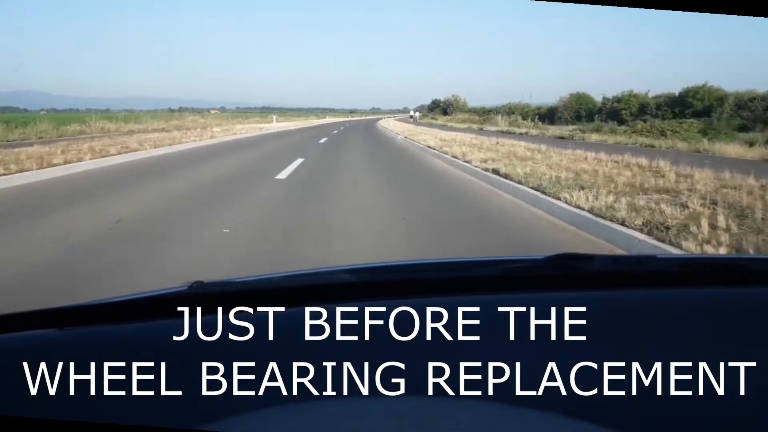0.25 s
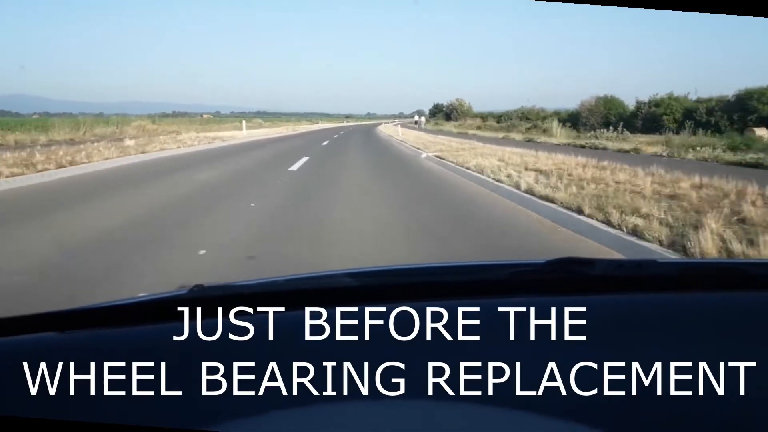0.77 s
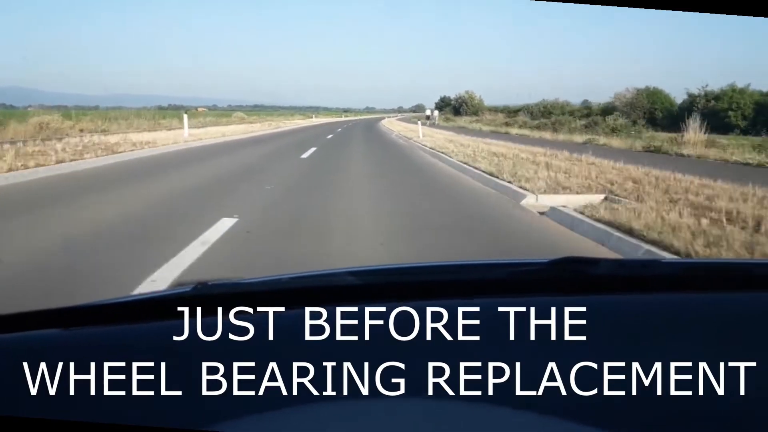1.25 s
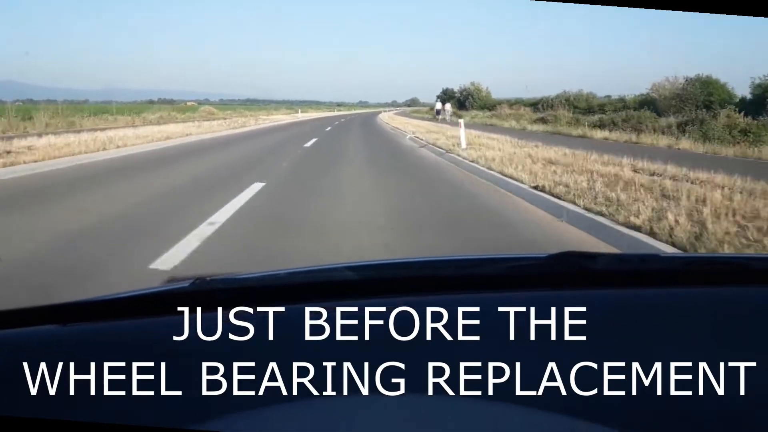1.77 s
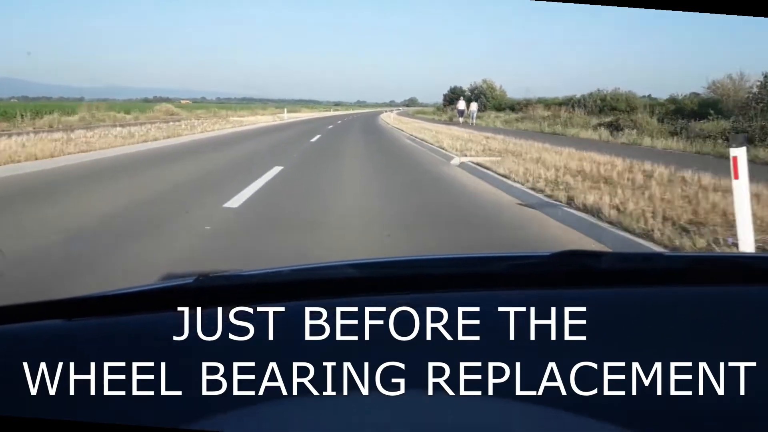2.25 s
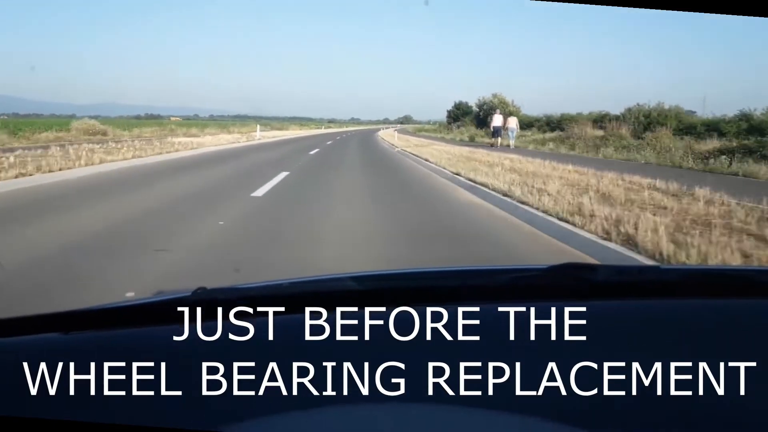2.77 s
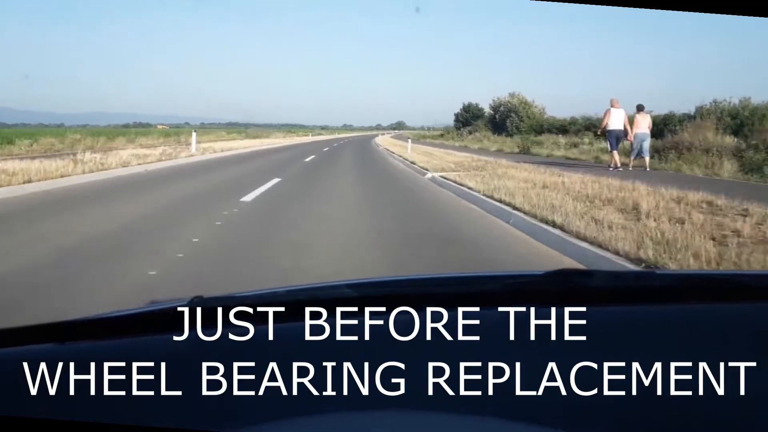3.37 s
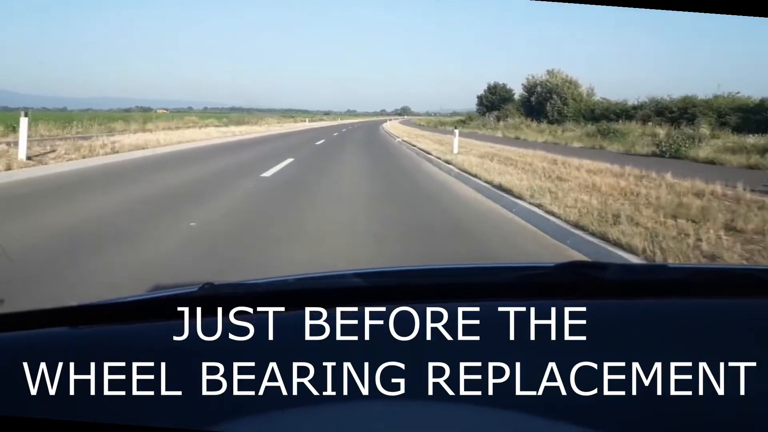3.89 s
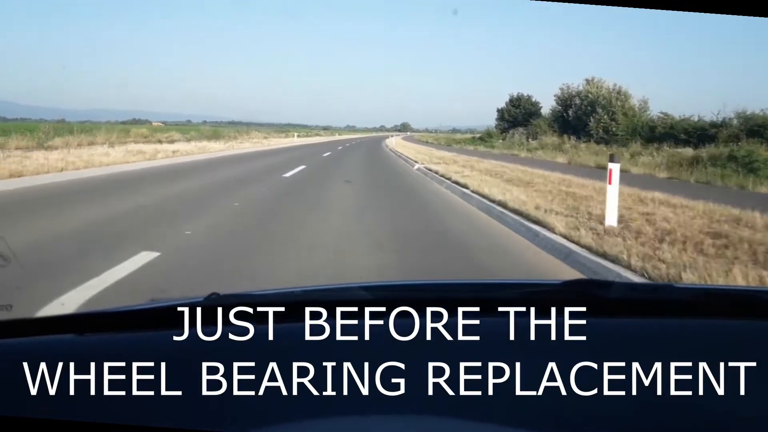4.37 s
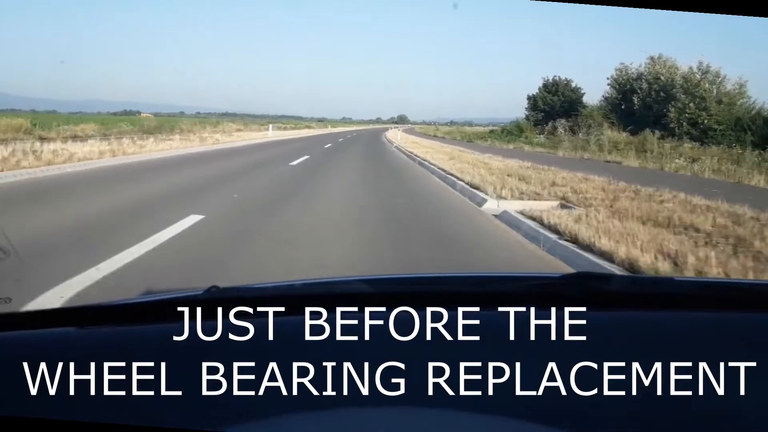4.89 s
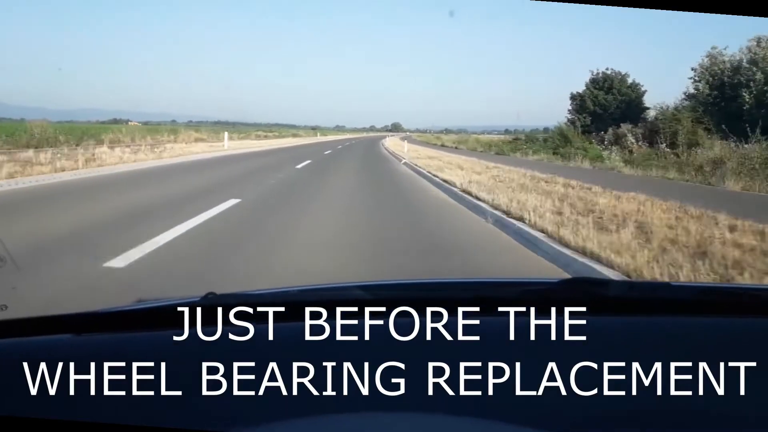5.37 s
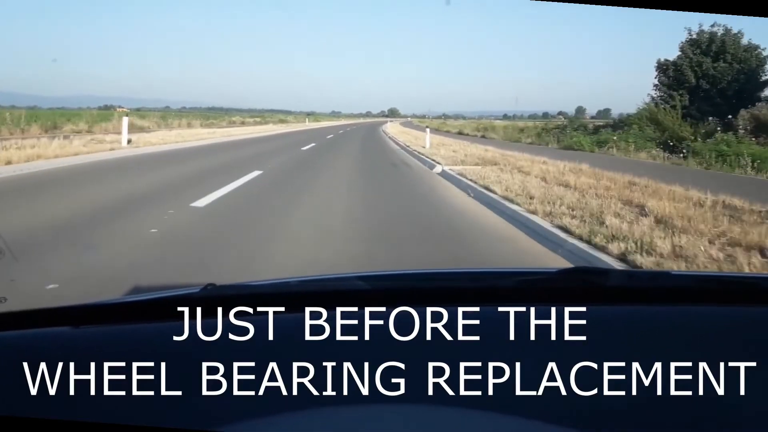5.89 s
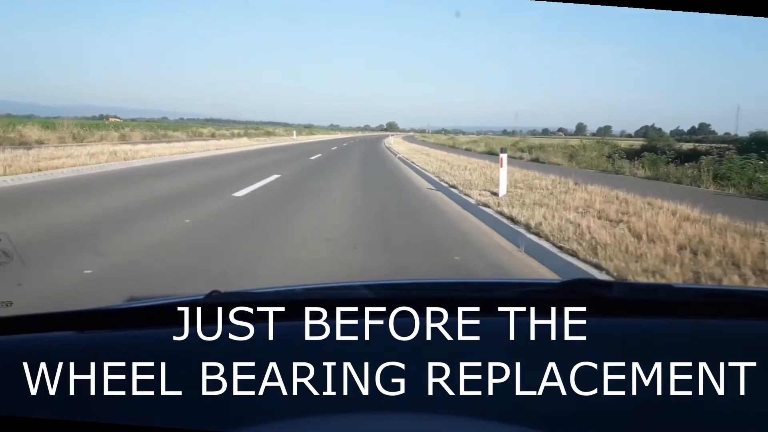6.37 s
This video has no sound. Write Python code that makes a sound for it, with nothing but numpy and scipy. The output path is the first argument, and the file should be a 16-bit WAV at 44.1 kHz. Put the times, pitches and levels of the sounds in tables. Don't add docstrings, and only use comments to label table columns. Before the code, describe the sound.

The enclosed cabin of a car cruising on smooth asphalt, heard from the dashboard for about 6.6 seconds. A worn wheel bearing drones throughout, a dense humming howl strongest near 360 hertz, with lower tones around 120 and 180 to 240 hertz and weaker harmonics above. It fills out within the first 0.2 seconds, grows stronger after about 2.4, and is fullest around 3.2 to 3.8, then keeps wavering. Rapid throbbing at roughly 14 pulses a second follows wheel rotation; slower road loads make the low tones swell and dip, notably dipping near 4.5. Pitch creeps up very slightly. Engine hum near 100 hertz, boomy body rumble, tyre roar and soft wind continue beneath. Faint high swishes pass in a repeating pattern. Small plastic ticks occur sporadically, with the clearest pair around 5.8 and another near 6.4.

```python
import sys
import numpy as np
from scipy import signal
from scipy.fft import rfft, irfft, next_fast_len
from scipy.io import wavfile
from scipy.ndimage import uniform_filter1d, minimum_filter1d

SR = 44100
rng = np.random.default_rng(int(sys.argv[2]) if len(sys.argv) > 2 else 0)


def natural_amplitude(level_db):
    exponent = np.asarray(level_db, float) / 20
    return 10 ** exponent


def log_audio(samples):
    frames = np.atleast_2d(samples).T
    limited = np.clip(frames, -1, 1)
    pcm = np.round(limited * 32767).astype(np.int16)
    wavfile.write(sys.argv[1], SR, pcm)


N = 292824
T = np.arange(N) / SR
WHEEL = .1553


def bump(s, length):
    return np.exp(-((T - s) / length) ** 2)


def walk(rate):
    hold = int(SR / rate)
    steps = np.repeat(rng.standard_normal(N // hold + 1), hold)
    return 0.77 * uniform_filter1d(uniform_filter1d(steps, hold), hold)[:N]


def noise(points, flicker_db, rate, peaks=()):
    size = next_fast_len(N)
    hz = np.maximum(np.arange(size // 2 + 1) * SR / size, 1)
    point_hz, point_db = np.transpose(points)
    density_db = np.interp(np.log(hz), np.log(point_hz), point_db, left=-140, right=-140)
    for centre, width, lift_db in peaks:
        density_db += lift_db / (1 + (2 * (hz - centre) / width) ** 2)
    spectrum = rfft(rng.standard_normal(size)) * natural_amplitude(density_db) * np.sqrt(SR / 2)
    out = 0
    for octave in range(4, 15):
        share = np.clip(1 - np.abs(np.log2(hz) - octave), 0, 1)
        out = out + natural_amplitude(flicker_db * walk(rate)) * irfft(spectrum * share, size)[:N]
    return out


def band(low_hz, high_hz):
    sos = signal.butter(2, [low_hz, high_hz], "band", fs=SR, output="sos")
    return signal.sosfilt(sos, rng.standard_normal(N))


def line(turns, db, waver_db, blur):
    phase = 2 * np.pi * (turns + rng.random()) + blur * walk(6)
    return np.sqrt(2) * natural_amplitude(db + waver_db * walk(4)) * np.sin(phase)


# rockings a second in Hz, pitch swing in Hz,
# first crest in seconds.
SWAY = [(1.74, .09, .293), (1.15, .065, .83)]


def ball_passes():
    rocking = sum(swing * np.cos(2 * np.pi * rate * (T - s)) for rate, swing, s in SWAY)
    start_hz, gain_hz_per_s = 90.24, .106
    return np.cumsum(start_hz + gain_hz_per_s * T + rocking) / SR


# pitch in Hz, level in dB per Hz.
HISS = [(2000, -97.5), (2900, -85.5), (3500, -82), (4300, -80), (5000, -87), (5800, -91.5), (7000, -88.5),
        (7400, -94.5), (7900, -105), (10500, -108), (11500, -106.5), (15800, -107)]


def wind():
    return noise(HISS, flicker_db=1.2, rate=14)


# pitch in Hz, level in dB per Hz.
BOOM = [(22, -71.5), (40, -50), (65, -46.5), (95, -45.5), (112, -36.5), (130, -42), (160, -43), (250, -47),
        (300, -49.5), (350, -46), (400, -52.5), (480, -53), (700, -59.5)]


def body_boom():
    return natural_amplitude(1.74 * walk(7)) * noise(BOOM, flicker_db=2.17, rate=5)


# pitch in Hz, level in dB per Hz.
ROAR = [(700, -60), (830, -56), (1200, -60.5), (1700, -67), (2100, -66.5), (2400, -77.5), (2900, -85),
        (3400, -93.5)]
# pitch in Hz, width in Hz, lift in dB.
PANELS = [(1177, 48, 5), (1307, 37, 4.5), (1475, 100, 4), (1634.8, 44, 6), (1973, 70, 5.5), (2240, 60, 3.5),
          (2345, 40, 3.5), (2523, 31, 7), (2740, 55, 5)]
# middle in seconds, roar change in dB, length in seconds.
PATCHES = [
    (0.498, 1, 0.54),
    (2.454, -1.5, 0.12),
    (3.2, 0.5, 0.28),
    (4.1, -1, 0.089),
    (5.4, -.5, 0.46),
    (6.25, 0, .15),
]


def tyre_roar(turns):
    patches_db = sum(db * bump(s, length) for s, db, length in PATCHES)
    grit = natural_amplitude(1.28 * walk(7.8) + patches_db)
    roar = grit * noise(ROAR, flicker_db=.5, rate=8.2, peaks=PANELS)
    return roar * (1 + 0.079 * np.sin(2 * np.pi * turns))


# time into the row in seconds, level in dB, length in seconds.
SWISHES = [
    (.44, -71.5, .055),
    (.64, -75, .022),
    (.89, -71.5, .048),
    (1.07, -76, .015),
    (1.55, -72, .055),
]


def high_swishes():
    row_s = 1.775
    swelling = sum(natural_amplitude(db) * bump(s + row * row_s, length) for s, db, length in SWISHES for row in range(4))
    return natural_amplitude(2.5 * walk(60)) * swelling * (5.5 * band(7000, 9300) + 2.1 * band(9000, 12500))


# start in seconds, peak level in dB, extra middle ring in dB, extra top ring in dB.
TICKS = [(0.071, -50.5, 1, 0), (0.115, -55, 0.1, 3.5), (0.4871, -50, 11.5, -3), (0.9955, -54.5, -2, 7),
         (1.0794, -57.5, 3, -1), (1.498, -52.5, 0, -3), (1.943, -52.5, 1, -1), (2.8122, -54, 0, 0.5),
         (3.9219, -49.5, 0, 7), (4.3488, -52.5, -4, 2.5), (5.3442, -47.5, -4.5, 3.5), (5.7623, -40, 1, -2),
         (5.8194, -43, -3, -1), (6.406, -49, -3, 3.5)]


def trim_ticks():
    low, middle, top = 9 * band(3600, 4900), 3.5 * band(6300, 7500), band(11000, 15500)
    out = 0
    for s, db, middle_db, top_db in TICKS:
        fade = (T >= s) * np.exp(-np.maximum(T - s, 0) / 0.006)
        ring = low + natural_amplitude(middle_db) * middle + natural_amplitude(top_db) * top
        out = out + natural_amplitude(db - 6.0) * fade * ring
    return out


def trim_creaks():
    creaks_per_s, creak_db, spread_db, fade_s = 12, -72, 3.5, .002
    slips = rng.random(N) < creaks_per_s / SR
    starts = slips * natural_amplitude(creak_db + spread_db * rng.exponential(size=N))
    fading = signal.lfilter([1], [1, -np.exp(-1 / (fade_s * SR))], starts)
    return fading * 2 * band(8000, 15500)


# cycles per wheel turn, level in dB.
TYRE = [(2, -46), (3, -37), (4, -39), (5, -46), (6, -40), (8, -32), (9, -35), (10, -39), (27.75, -36),
        (36.35, -41)]


def tyre_hum(wheel):
    return sum(line(k * wheel, db, waver_db=1.5, blur=0.38) for k, db in TYRE)


# multiple of the firing pitch, level in dB.
ENGINE = [(1, -22), (2, -42), (3, -45), (3.25, -38), (4, -36), (5, -39), (6, -51), (6.25, -43), (8, -53),
          (10, -55)]


def engine_hum(turns):
    firing = 1.0765 * turns
    return sum(line(k * firing, db, waver_db=2.5, blur=0.12) for k, db in ENGINE)


def race(turns, wheel, table, loud, loud_db):
    out = 0
    for k, db, below_db, above_db in table:
        k = round(k)
        if k == loud:
            out = out + line(k * turns, loud_db, waver_db=1.17, blur=0.21)
        else:
            out = out + line(k * turns, db, waver_db=1.5 + .05 * k, blur=.025 * k)
        for side, side_db in ((-1, below_db), (0.96, above_db)):
            if side_db > -60:
                out = out + line(k * turns + side * wheel, side_db, waver_db=0.5, blur=0.37)
    return out


# harmonic number, level in dB, side tone one wheel turn below in dB,
# side tone one wheel turn above in dB.
INNER = [(1, -18, -45, -46), (2, -29, -27, -33), (4, -53, -44, -45), (5, -57, -43, -52), (7, -42, -48, -44),
         (8, -44, -50, -51), (10, -49, -64, -58), (11, -54, -47, -52)]
# middle in seconds, change in dB.
SWELLS = [(1.25, 2.5), (1.95, -7.5), (2.27, 7.5), (2.75, -4), (3.2, 6), (3.5, -8), (4.08, 5.5), (4.52, -17),
          (5.32, -1.5), (5.88, 7), (6.43, 3)]


def inner_race(turns, wheel):
    load_db = 1.5 * walk(6) + sum(db * bump(s, .055) for s, db in SWELLS)
    return race(1.333 * turns, wheel, INNER, loud=1, loud_db=-18 + load_db)


# harmonic number, level in dB, side tone one wheel turn below in dB,
# side tone one wheel turn above in dB.
OUTER = [(1, -46, -50, -45), (2, -25, -43, -32), (3, -30, -52, -54), (4, -14, -36, -39), (5, -36, -59, -53),
         (6, -29, -57, -52), (7, -29, -56, -52), (8, -45, -50, -45), (9, -45, -58, -49),
         (10, -43, -65, -64), (11, -40, -61, -56), (12, -41, -65, -64), (13, -39, -65, -64),
         (14, -46, -66, -68), (15, -57, -67, -66), (16, -46, -54, -55), (17, -47, -68, -66),
         (18, -53, -61, -67), (19, -61, -64, -71), (20, -59, -72, -68), (21, -58, -69, -71),
         (22, -47, -69, -66), (23, -58, -71, -64), (24, -64, -65, -74), (25, -72, -76, -68),
         (26, -64, -68, -72)]
# harmonic number,
# change in dB per second.
DRIFT = [(7, .3), (9, -.6), (11, .8), (12, -.9), (13, -.9), (22, -.6)]
# time in seconds, level in dB.
DRONE = [(0.1, -29), (0.15, -20.5), (0.35, -24.5), (0.66, -19), (2.42, -13.5), (2.54, -14.5), (3.19, -11),
         (3.25, -13.5), (3.81, -10.5), (4.52, -15), (5.31, -13), (5.4, -15), (5.55, -13), (6.6, -16)]


def outer_race(turns, wheel):
    drift = dict(DRIFT)
    drifting = [(k, db + drift.get(k, 0) * (T - T.mean()), *sides) for k, db, *sides in OUTER]
    drone_s, drone_db = np.transpose(DRONE)
    return race(turns, wheel, drifting, loud=4, loud_db=np.interp(T, drone_s, drone_db))


def scene():
    turns = ball_passes()
    wheel = WHEEL * turns
    background = wind() + body_boom() + tyre_roar(turns) + high_swishes() + tyre_hum(wheel)
    trim = trim_ticks() + trim_creaks()
    bearing = inner_race(turns, wheel) + outer_race(turns, wheel)
    return (background + trim + engine_hum(turns) + bearing)[None]


def top_cut(x):
    return signal.sosfilt(signal.butter(12, 15750, fs=SR, output="sos"), x)


def record(dry):
    gain = np.maximum(np.abs(dry[0]) / .82, 1) ** -.7
    gain = minimum_filter1d(gain, size=301)
    gain = uniform_filter1d(uniform_filter1d(gain, size=151), size=151)
    return top_cut(dry * gain)


dry = scene()
out = record(dry)
log_audio(out)
```